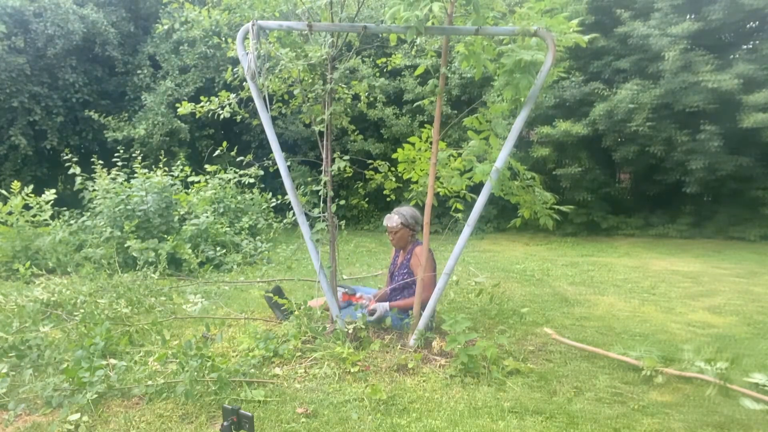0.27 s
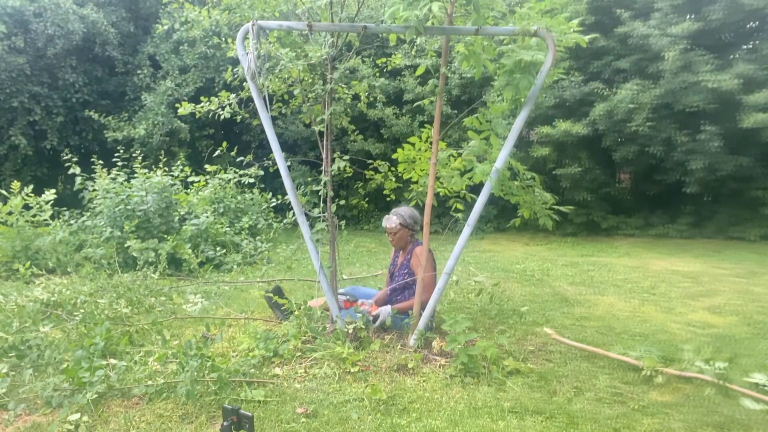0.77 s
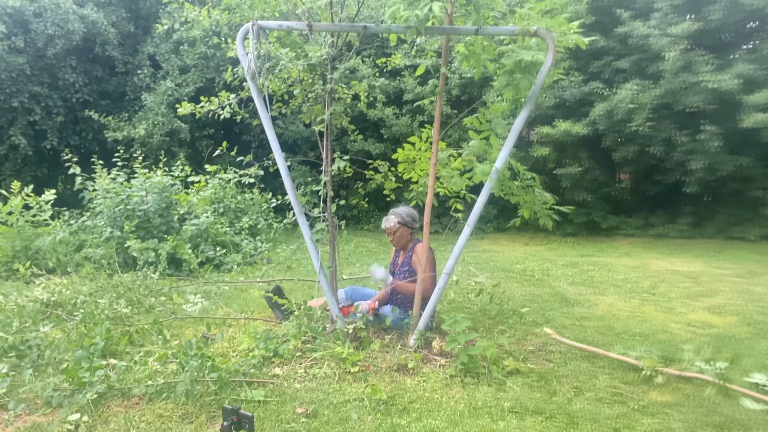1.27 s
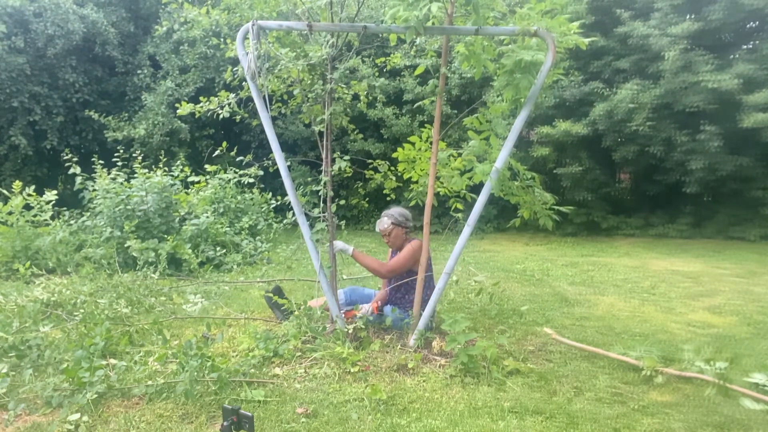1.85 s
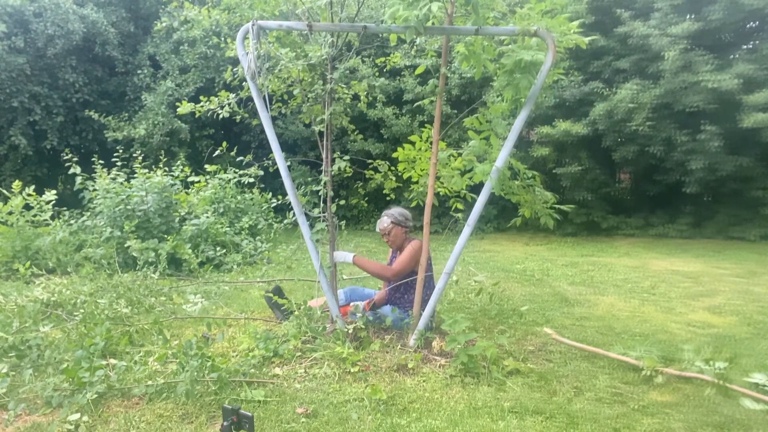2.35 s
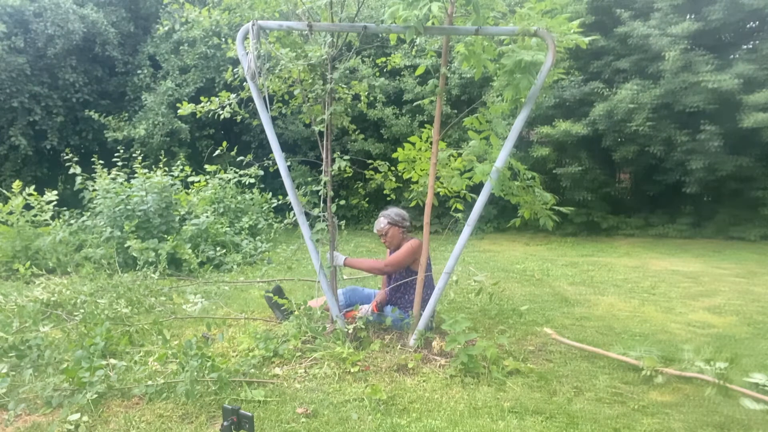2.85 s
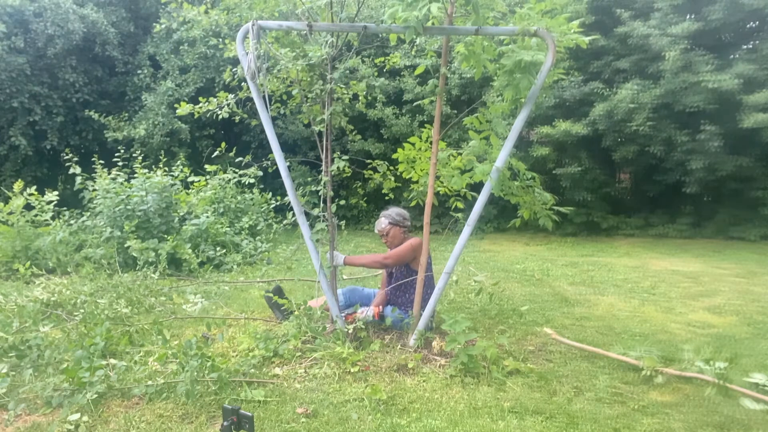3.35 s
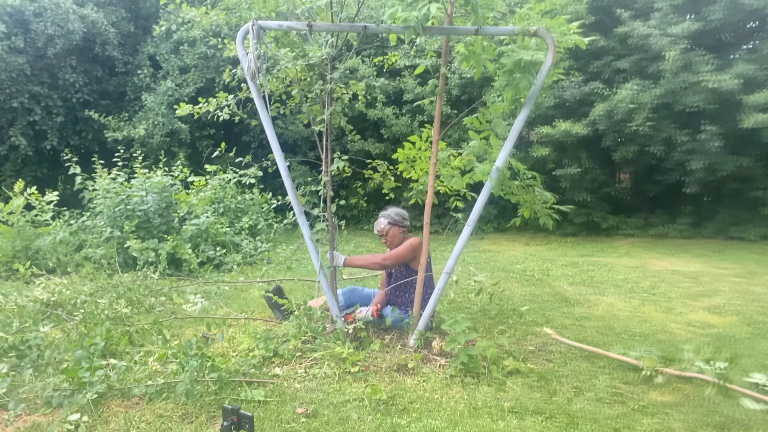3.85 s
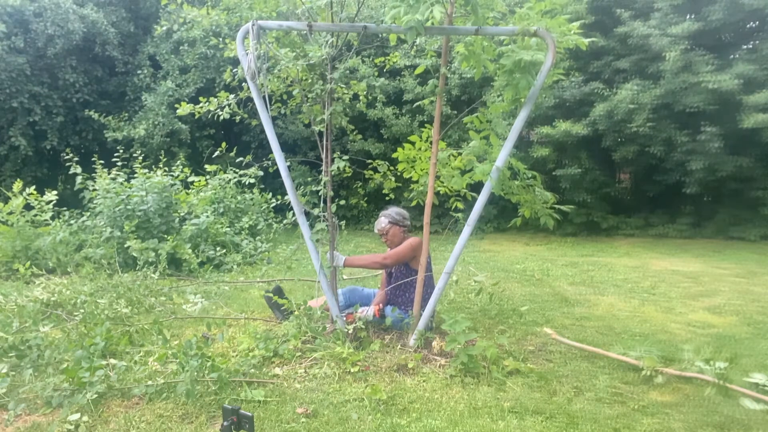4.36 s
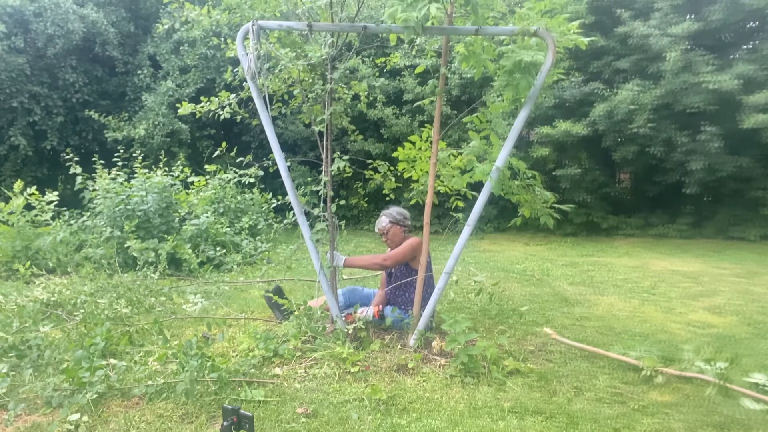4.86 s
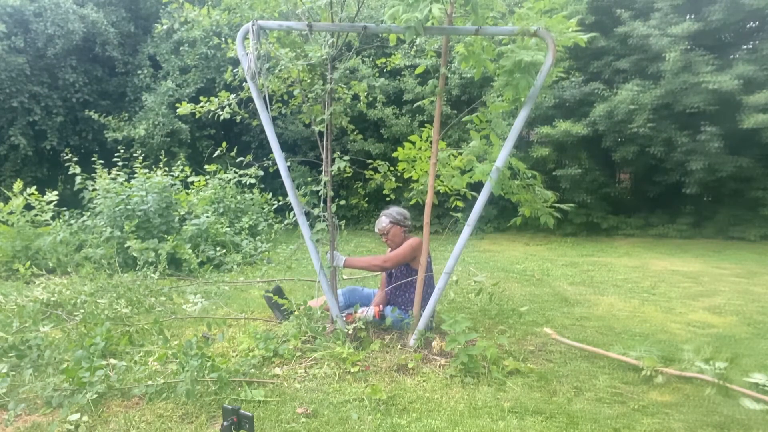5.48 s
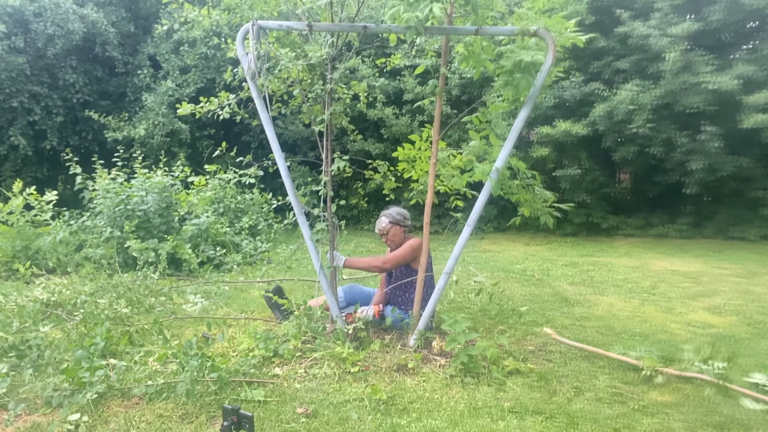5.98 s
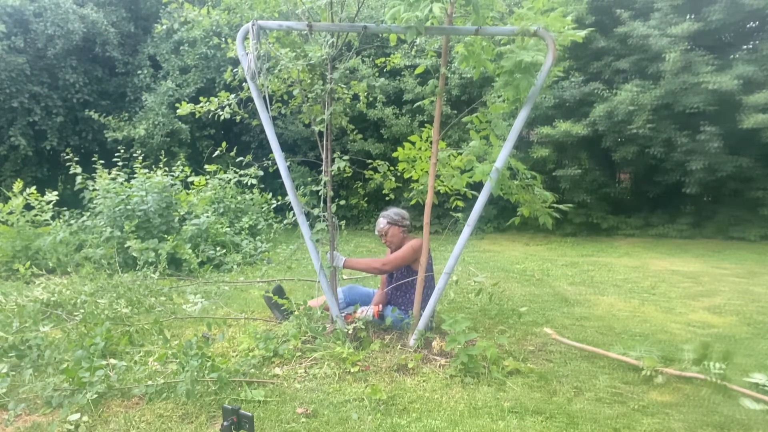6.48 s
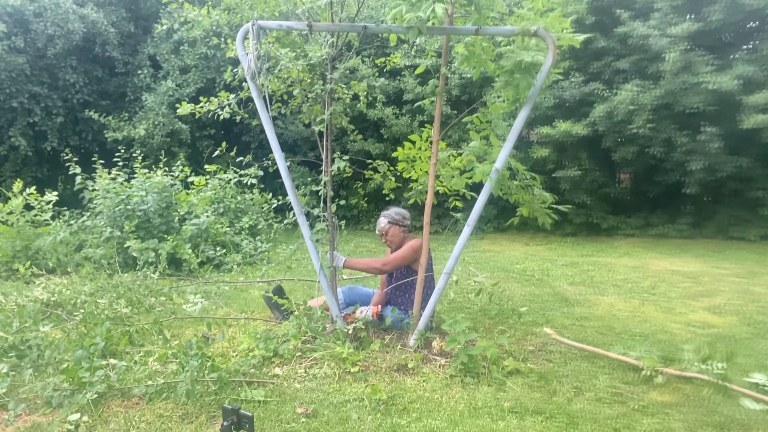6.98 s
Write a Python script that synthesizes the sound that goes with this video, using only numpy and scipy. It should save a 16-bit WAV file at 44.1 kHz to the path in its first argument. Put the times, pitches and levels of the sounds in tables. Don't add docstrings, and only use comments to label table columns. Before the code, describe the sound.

Open-air stereo pickup, several metres from a small battery chainsaw. After a brief lull with distant road rumble and bird chirps, the motor snaps on and the chain buzzes dry and metallic, bright with hiss and a thin electric whine. The tool then enters wood: the speed sags, the rattle thickens and bounces, woody thumps and sharp catches come irregularly, still running at the end.

```python
import sys
import numpy as np
from scipy import signal
from scipy.fft import rfft, irfft, next_fast_len
from scipy.io import wavfile

SR = 44100
rng = np.random.default_rng(int(sys.argv[2]) if len(sys.argv) > 2 else 0)


def amplitude_ratio(level_db):
    exponent = np.asarray(level_db, float) / 20
    return 10 ** exponent


def store_wav(level_fs):
    pcm = np.round(np.clip(np.atleast_2d(level_fs), -1, 1) * 32767)
    wavfile.write(sys.argv[1], SR, pcm.T.astype(np.int16))


N = 318843

# (frequency [Hz], density [dB per Hz])
TRAFFIC_SPECTRUM = [(22, -17), (50, -6), (70, 4), (92, 0.5), (150, -5), (187, -12.5), (260, -13.5),
                    (390, -19), (760, -19.5), (1200, -27), (2400, -33.5), (4200, -52.5), (5200, -62),
                    (8000, -58.5), (13500, -72)]
# (time [s], length [s], frequency [Hz], level [dB])
HUM_SWELLS = [
    (0.18, 1.24, 219.1, -53.5),
    (3.1, 1.65, 212.3, -53.5),
    (4.734, 0.48, 211, -49),
    (5.132, 1.37, 209.2, -49.5),
    (6.516, 0.42, 207.7, -56),
    (7.12, 0.21, 215.4, -50.5),
]
# (time [s], length [s], from [Hz], to [Hz], level [dB])
BIRD_NOTES = [(0.015, 0.01, 2830, 2620, -52), (0.032, 0.013, 2950, 3530, -48),
              (0.036, 0.055, 3340, 3390, -56), (0.135, 0.01, 2750, 2650, -52),
              (0.132, 0.02, 4100, 5000, -70), (0.154, 0.014, 4800, 5070, -69),
              (0.157, 0.017, 5100, 4230, -68), (0.153, 0.014, 2850, 3600, -48.5),
              (0.163, 0.021, 4360, 3830, -60), (0.178, 0.055, 3500, 4030, -62),
              (0.425, .02, 3080, 2790, -62)]

# (time [s], speed [turns per s])
ROTOR_SPEED = [(.9, 472.5), (1.35, 473), (1.55, 467.5), (2.1, 470), (2.5, 474), (2.93, 474), (3.07, 458),
               (3.31, 443), (3.79, 420), (4.03, 415), (4.27, 419), (4.45, 398), (4.6, 402), (4.7, 423),
               (5.0, 419), (5.6, 417), (5.95, 421), (6.31, 397), (6.6, 402), (6.88, 395), (7.1, 408)]
# (time [s], level [dB])
CHAIN_LEVEL = [(.5, -33), (.55, -35.5), (.59, -35), (.67, -38), (.9, -38), (1.2, -39.5), (1.9, -38.5),
               (2.3, -40), (2.85, -38.5), (3.2, -36.5), (3.7, -36), (4.0, -38.5), (4.4, -36), (5.7, -36.5),
               (6.3, -35), (7.0, -36), (7.23, -34.5)]
# (time [s], peak level [dB])
GRABS = [(0.526, -26), (0.572, -23), (0.582, -21.5), (0.603, -36), (0.939, -32), (1.056, -30),
         (1.116, -25.5), (1.173, -34), (1.227, -35), (1.512, -26), (2.29, -23), (2.328, -28), (2.399, -25),
         (2.767, -34), (3.169, -20.5), (3.593, -25), (4.371, -24), (4.507, -24.5), (4.533, -24),
         (4.838, -27), (4.892, -35), (5.076, -38), (5.13, -20.5), (5.664, -31.5), (6.101, -29),
         (6.235, -27), (1.331, -22.5), (1.398, -23), (2.973, -16), (3.108, -17), (3.218, -20), (3.382, -20),
         (3.482, -18.5), (3.562, -14.5), (3.639, -21.5), (3.678, -17), (4.175, -15), (4.203, -17),
         (4.227, -20), (4.34, -21), (4.399, -21), (4.419, -16), (4.48, -23), (4.548, -19), (4.605, -19.5),
         (4.933, -21), (5.315, -18), (5.882, -21.5), (6.061, -15), (6.252, -17.5), (6.396, -18),
         (6.487, -29)]
# (time [s], peak level [dB])
BOUNCES = [
    (3.742, -25),
    (3.763, -19),
    (3.808, -16),
    (3.895, -15),
    (3.956, -16),
    (4.005, -16.5),
    (4.049, -16),
    (4.097, -22),
    (4.133, -19),
]
# (time [s], peak level [dB])
SNAPS = [
    (0.852, -18.5),
    (4.311, -16),
    (3.848, -16.5),
    (6.339, -18.5),
]
# (time [s], peak level [dB])
CHIP = [
    (6.323, -27),
]
# (treble [dB], thump [dB], hard contact [dB])
GRAB_SHARES = (-7.5, -17, 12)
BOUNCE_SHARES = (-3, -13, -6)
SNAP_SHARES = (-6.5, -15.5, 7.4)

# (multiple of the shaft speed [-], level [dB])
GEAR_LINES = [(2 / 3, -9), (1, -9), (2, -7), (3, -10), (3.5, -7), (4, 1), (5, -10)]
ROTOR_LINES = [(1, -7.5), (2, -7.5), (4, -8), (12, 0)]

# (frequency [Hz], width [Hz], level [dB])
BAR_MODES = [(1373, 730, -2.5), (1784, 247, 4), (1933, 140, 4), (2560, 61, -13)]
HOUSING_MODES = [(2950, 780, 2.5), (3390, 920, 2), (4185, 220, -1), (4600, 950, -7)]
STEM_MODES = [(156, 77, 0), (360, 82, 0)]
WOOD_MODES = [(524, 145, -0.5), (793, 130, -1.3), (1055, 75, -5)]
# (frequency [Hz], width [Hz], level [dB])
KERF_MODES = [(1008, 81, 0)]
SURGE_MODES = [(780, 180, 1), (1550, 300, 0), (1850, 200, -1)]
SNAP_MODES = [(720, 200, -2), (1050, 200, -2), (1850, 200, 0)]
# (frequency [Hz], width [Hz], level [dB])
RING_SLACK_MODES = [(1634, 49, -2), (1852, 47, 3)]
RING_CUT_MODES = [(1483, 220, -0.5), (1855, 200, -2.5), (1948, 67, 7)]
# (frequency [Hz], density [dB per Hz])
HISS_SPECTRUM = [(300, -22), (2000, -9), (4000, -6), (5200, -5), (6500, -5), (7600, -2), (8500, -3),
                 (9800, 0), (11000, -1), (13000, -4.5), (14300, -6), (15720, -4.5), (15790, -50)]
# (running free [dB], full load [dB], slack chain adds [dB])
WOOD_SHARE = (-13.5, -10, 4.4)
BAR_SHARE = (-7.5, -9, 4.8)
HOUSING_SHARE = (-7.5, -9, -5.5)
HISS_SHARE = (-4.5, -5.5, -2.5)

# (frequency [Hz], left leads [rad], left-right [dB], scattered share [dB])
FAR_PORTS = [(30, 0.5, -0.5, -32), (118, -0.85, -1.5, -11.5), (327, 0.94, -2, -5), (990, 2.5, 3, -6.5),
             (2200, 6.5, -5.5, -1.5), (4500, 6.3, 0, -7), (6900, 5.8, 0, -6), (7600, 4.6, 0, -5),
             (8600, 4.1, 0, -8), (9100, 3.2, 0, -18), (10300, 3.0, 0, -18), (11000, .7, 0, -15),
             (11700, .1, 0, -15), (13100, -.3, 0, -15), (13800, -2.9, 0, -18)]
SAW_PORTS = [(50, 0, -1, -14), (500, .35, .5, -11), (1200, .5, 0, -18), (2300, .9, 0, -12),
             (3100, 1.5, -3, -12), (4150, 2.15, 0, -10), (4850, 2.35, 0, -11), (5200, 3.05, 0, -11.5),
             (5600, 3.1, 0, -11.5), (6200, 3.15, 0, -7.5), (6900, 3.6, -2, -8), (7500, 4.5, -4, -10),
             (8300, 4.55, -3.5, -9.5), (9050, 3.2, 0, -21), (9800, 3.05, 0, -16), (10300, 2.3, 0, -11),
             (11000, 1.1, 0, -13), (11750, .08, 0, -21), (12500, -.1, 0, -21), (13100, -.75, 0, -16),
             (13800, -2.3, 0, -16), (14450, -3.12, 0, -19), (15300, -3.12, 0, -17),
             (15650, -3.12, 0, -12.5)]

TRAFFIC_DB = -42
START_S, SPIN_UP_S, SPIN_UP_SHORT_TPS = .49, .056, 250
FREE_SPEED_TPS, LOAD_SAG_TPS = 469, 18
SLACK_S, TAKE_UP_S, BITE_S = 1, .085, 3.0
GEAR_RATIO = 2.564
GEAR_DB, GEAR_LOAD_DB, GEAR_FADE_DB_PER_S = -50, -.5, 2.4
ROTOR_DB, ROTOR_LOAD_DB, ROTOR_LATE_DB, ROTOR_RISE_S = -54, 3.5, -18, .45
SECOND_LOAD_DB = -2
SURGE_S, SURGE_DB = .582, -28
SNAP_LATE_S, SNAP_DB = .0035, -5.5
KERF_DB = -5.5
RING_SLACK_DB, RING_CUT_DB, RING_SETTLES_S = -11, -4.5, 1.45
SCATTER_FREE_DB, SCATTER_SINKS_DB_PER_S = 2.6, .85
SCATTER_LATE_DB, SCATTER_BUILDS_S = 5, .4
SCATTER_DRIFT_DB, SCATTER_DRIFT_HZ = 1.5, 12


def rms_one(x):
    return x / np.sqrt(np.mean(x ** 2) + 1e-20)


def seconds():
    return np.arange(N) / SR


def in_time(rows):
    s, *columns = np.transpose(rows)
    return [np.interp(seconds(), s, c) for c in columns]


def at_hz(points, size):
    hz, *columns = np.transpose(points)
    grid = np.log(np.maximum(np.arange(size // 2 + 1) * SR / size, 1))
    return [np.interp(grid, np.log(hz), c) for c in columns]


def drift(hz):
    r = np.exp(-16 * np.pi * hz / SR)
    noise = rng.standard_normal(N // 8 + 4002)
    slow = signal.lfilter([1], [1, -2 * r, r * r], noise)[4000:]
    return np.interp(np.arange(N) / 8, np.arange(len(slow)), rms_one(slow))


def colour(x, spectrum):
    size = next_fast_len(N)
    return rms_one(irfft(rfft(x, size) * amplitude_ratio(at_hz(spectrum, size)[0]), size)[:N])


def body(x, modes):
    out = 0
    for k, (hz, width_hz, db) in enumerate(modes):
        r = np.exp(-np.pi * width_hz / SR)
        b = np.array([1, 0, -1]) * (1 - r * r) / 2
        a = [1, -2 * r * np.cos(2 * np.pi * hz / SR), r * r]
        out = out + (-1) ** k * amplitude_ratio(db) * signal.lfilter(b, a, x)
    return rms_one(out)


def rattle(per_s, spread_db, uneven_db):
    sizes = amplitude_ratio(spread_db * np.minimum(rng.exponential(1, N), 5)) * rng.choice([-1, 1], N)
    hits = rng.random(N) < per_s / SR
    return rms_one(sizes * hits * amplitude_ratio(uneven_db))


def bursts(times_s, db, rise_s, fall_s):
    marks = np.zeros(N)
    marks[np.round(np.asarray(times_s) * SR).astype(int)] = amplitude_ratio(db)
    t = np.arange(round(8 * fall_s * SR)) / SR
    rise = t / rise_s * np.exp(1 - t / rise_s) * (t < rise_s)
    fall = np.exp(-(t - rise_s) / fall_s) * (t >= rise_s)
    return signal.fftconvolve(marks, rise + fall)[:N]


def ports(direct, scattered, table):
    size = next_fast_len(N + 512)
    lead_rad, balance_db, scatter_db = at_hz(table, size)
    side = np.array([[.5], [-.5]])
    scatter = 2 * side * amplitude_ratio(scatter_db) * rfft(scattered, size)
    mix = (rfft(direct, size) + scatter) / np.hypot(1, amplitude_ratio(scatter_db))
    return irfft(mix * np.exp(1j * lead_rad * side) * amplitude_ratio(balance_db * side), size)[:, :N]


def traffic():
    return amplitude_ratio(TRAFFIC_DB) * colour(rng.standard_normal(N), TRAFFIC_SPECTRUM)


def hum():
    t = seconds()
    waver = np.cumsum(1.573 * drift(3.76)) / SR
    swells = 0
    for s, length_s, hz, db in HUM_SWELLS:
        swell = np.sqrt(np.sin(np.pi * np.clip((t - s) / length_s, 0, 1)) + 1e-12)
        swells = swells + amplitude_ratio(db) * swell * np.sin(2 * np.pi * (hz * t + waver))
    return amplitude_ratio(4.5 + 1.07 * drift(11.0)) * swells


def bird():
    out = np.zeros(N)
    for s, length_s, from_hz, to_hz, db in BIRD_NOTES:
        count, at = round(length_s * SR), round(s * SR)
        turns = np.cumsum(np.linspace(from_hz, to_hz, count)) / SR
        out[at:at + count] += amplitude_ratio(db) * np.hanning(count) * np.sin(2 * np.pi * turns)
    trees = rng.standard_normal(SR // 2) * np.exp(-np.arange(SR // 2) / SR / 0.041)
    return out + amplitude_ratio(-32.5) * signal.fftconvolve(out, trees)[:N]


def distance():
    return traffic() + hum() + bird()


def clock():
    return np.maximum(seconds() - START_S, 0)


def speed():
    return in_time(ROTOR_SPEED)[0] - SPIN_UP_SHORT_TPS * np.exp(-clock() / SPIN_UP_S)


def load():
    return 1 - np.exp(-np.maximum(FREE_SPEED_TPS - speed(), 0) / LOAD_SAG_TPS)


def rotor():
    s, peak_db = np.transpose([*GRABS, *BOUNCES, *SNAPS])
    chatter = np.tanh(bursts(s, peak_db + 15, rise_s=.03, fall_s=.1)) * load()
    tremor = (.0014 + .011 * chatter) * drift(25)
    return np.cumsum(speed() * (1 + tremor)) / SR


def part_db(share):
    free_db, load_db, slack_db = share
    effort_db = (load_db - free_db) * load()
    return in_time(CHAIN_LEVEL)[0] + free_db + effort_db + slack_db * np.exp(-clock() / SLACK_S)


def chip():
    s, peak_db = CHIP[0]
    tick = bursts([s], peak_db, rise_s=.0005, fall_s=.0006) * rng.choice([-1, 1], N)
    band = signal.butter(2, [8800, 12500], "band", fs=SR, output="sos")
    return amplitude_ratio(10.5) * signal.sosfilt(band, tick)


def snap():
    s, db = np.transpose(SNAPS)
    knock = bursts(s + SNAP_LATE_S, db, rise_s=.0001, fall_s=.0001)
    rung = body(knock + 1e-18, SNAP_MODES)
    return amplitude_ratio(db.max() + SNAP_DB) * rung / np.abs(rung).max()


def sing(turns, lines):
    out = 0
    for multiple, db in lines:
        out = out + amplitude_ratio(db + 2.5 + 2.5 * drift(6)) * np.sin(2 * np.pi * multiple * turns)
    return out


def whine(turns):
    gear_db = GEAR_DB + GEAR_LOAD_DB * load() - GEAR_FADE_DB_PER_S * np.minimum(clock(), 3)
    rotor_db = ROTOR_DB + ROTOR_LOAD_DB * load() + ROTOR_LATE_DB * np.exp(-clock() / ROTOR_RISE_S)
    gears = amplitude_ratio(gear_db) * sing(GEAR_RATIO * turns, GEAR_LINES)
    second = load() * sing(turns, [(2, SECOND_LOAD_DB - 13.5)])
    poles = amplitude_ratio(rotor_db) * (sing(turns, ROTOR_LINES) + second)
    engaged = np.clip((clock() - .05) / .04, 0, 1)
    return engaged * (gears + poles)


def saw(turns, judder_db):
    t = seconds()
    wood_db, bar_db = part_db(WOOD_SHARE), part_db(BAR_SHARE)
    housing_db, hiss_db = part_db(HOUSING_SHARE), part_db(HISS_SHARE)

    events = [(*row, *GRAB_SHARES) for row in GRABS]
    events += [(*row, *BOUNCE_SHARES) for row in BOUNCES]
    events += [(*row, *SNAP_SHARES) for row in SNAPS]
    s, peak_db, treble_db, thump_db, contact_db = np.transpose(events)
    soft = np.isin(s, np.transpose(BOUNCES)[0])
    grab = bursts(s[~soft], peak_db[~soft] - 16.5, rise_s=.0065, fall_s=.0075)
    grab = grab + bursts(s[soft], peak_db[soft] - 17.5, rise_s=.011, fall_s=.007)
    grab_treble = bursts(s, peak_db + treble_db - 10.0, rise_s=.0078, fall_s=.0045)
    thump = bursts(s, peak_db + thump_db - 10.0, rise_s=.0047, fall_s=.012)

    wobble_db = 1.1 * np.sin(2 * np.pi * turns / 7)
    links = rattle(3000, 2.65, 0.38 * judder_db + wobble_db)
    links = links + bursts(s + 0.004015, peak_db + contact_db, rise_s=.0001, fall_s=.0001)

    slack = np.clip((RING_SETTLES_S - t) / 0.1, 0, 1)
    biting = load() * (t > BITE_S)
    taken_up = np.clip(clock() / TAKE_UP_S, 0, 1)
    bar = body(links, BAR_MODES) * np.hypot(amplitude_ratio(bar_db - 0.86), amplitude_ratio(-2.5) * grab)
    ring_slack = body(links, RING_SLACK_MODES) * amplitude_ratio(RING_SLACK_DB) * slack * taken_up
    ring_cut = body(links, RING_CUT_MODES) * amplitude_ratio(RING_CUT_DB) * biting
    ring = amplitude_ratio(bar_db) * (ring_slack + ring_cut)
    wood = body(links, WOOD_MODES) * np.hypot(amplitude_ratio(wood_db - 1.44), amplitude_ratio(-5.0) * grab)
    kerf = body(links, KERF_MODES) * amplitude_ratio(wood_db + KERF_DB) * biting
    stem = body(links, STEM_MODES) * np.hypot(amplitude_ratio(wood_db - 16.0), thump)
    surge = body(links, SURGE_MODES) * bursts([SURGE_S], SURGE_DB, rise_s=.01, fall_s=.022)

    housing = body(rattle(6000, 2.5, judder_db + wobble_db), HOUSING_MODES)
    housing = housing * np.hypot(amplitude_ratio(housing_db + 2.0), amplitude_ratio(-6.5) * grab)
    hiss = colour(rattle(18000, 3.07, 1.17 * judder_db + wobble_db), HISS_SPECTRUM)
    hiss = hiss * np.hypot(amplitude_ratio(hiss_db + 7.0), grab_treble)

    running = np.clip((t - .491) / 0.033, 0, 1)
    driven = surge + wood + kerf + bar + ring + stem
    return running * (np.sqrt(taken_up) * driven + housing + hiss)


def scene():
    turns = rotor()
    judder_db = 0.25 * drift(29) + .5 * drift(20.5)
    scatter_db = SCATTER_FREE_DB - SCATTER_SINKS_DB_PER_S * np.maximum(seconds() - BITE_S, 0)
    scatter_db = scatter_db - SCATTER_LATE_DB * np.exp(-clock() / SCATTER_BUILDS_S)
    scatter_db = scatter_db + SCATTER_DRIFT_DB * drift(SCATTER_DRIFT_HZ)
    direct = saw(turns, judder_db) + whine(turns) + chip() + snap()
    scattered = amplitude_ratio(scatter_db) * saw(turns, judder_db)
    near = ports(direct, scattered, SAW_PORTS)
    return near + ports(distance(), traffic(), FAR_PORTS)


def top_cut(x):
    return signal.sosfilt(signal.butter(12, 15920, fs=SR, output="sos"), x)


def record(dry):
    return top_cut(dry)


dry = scene()
out = record(dry)
store_wav(out)
```